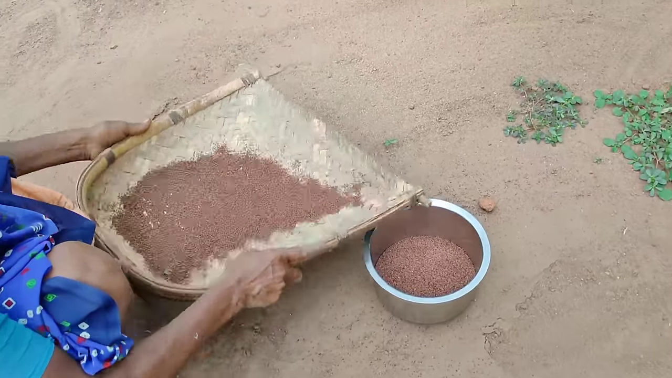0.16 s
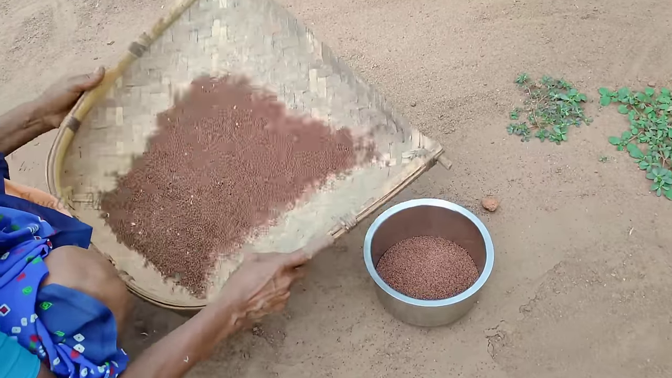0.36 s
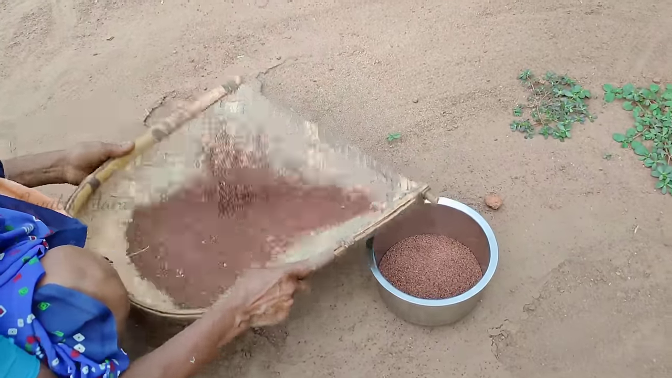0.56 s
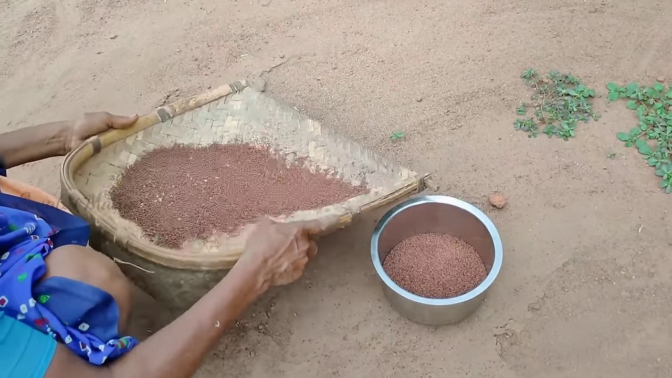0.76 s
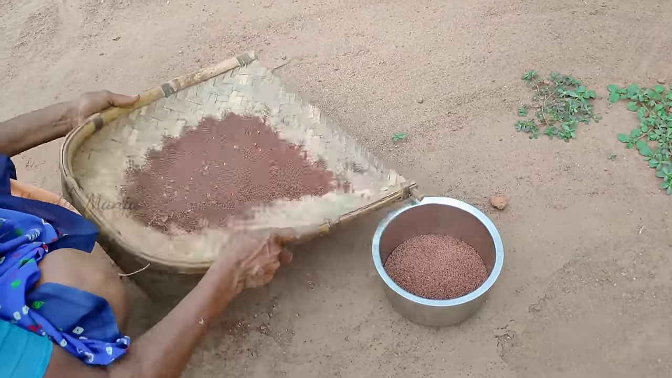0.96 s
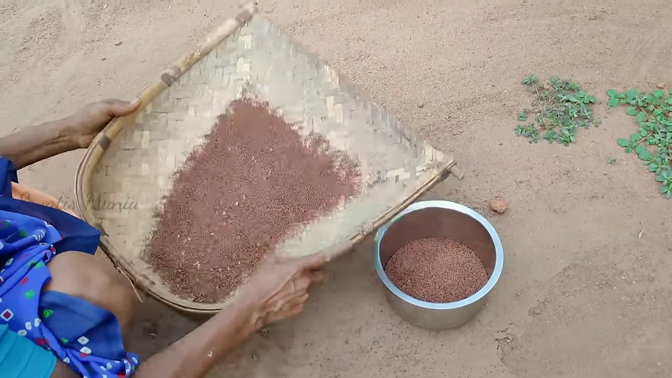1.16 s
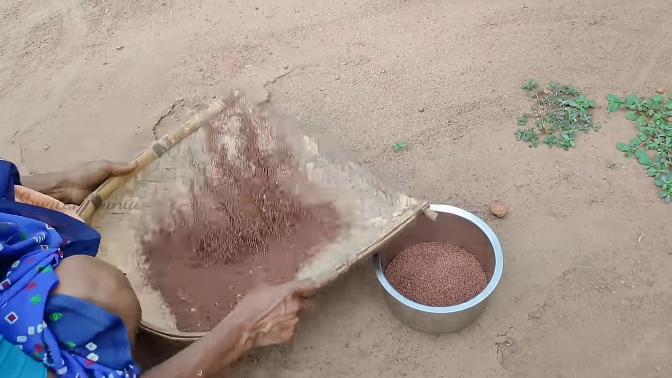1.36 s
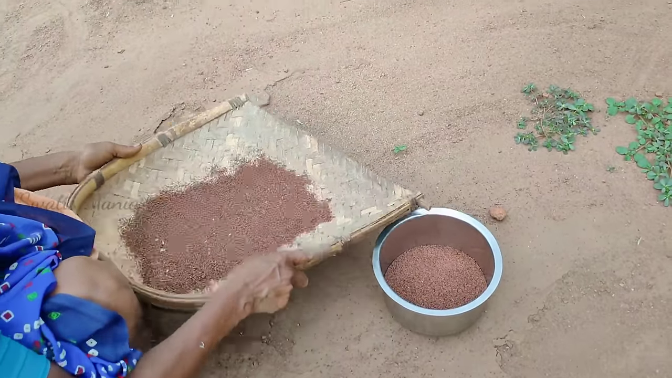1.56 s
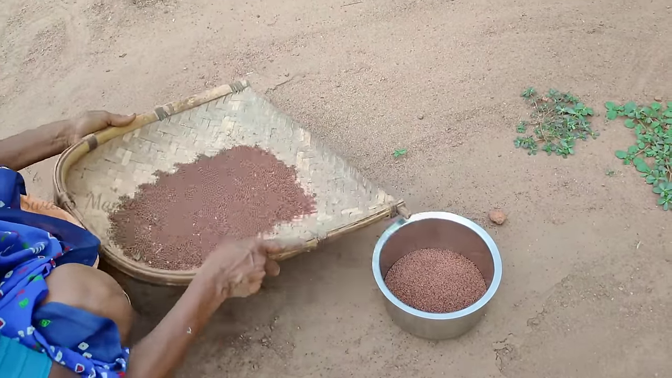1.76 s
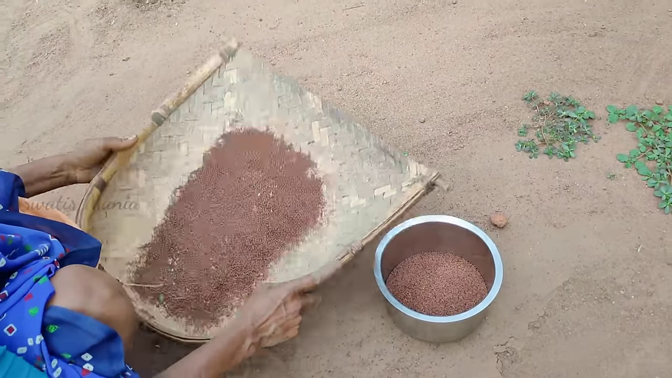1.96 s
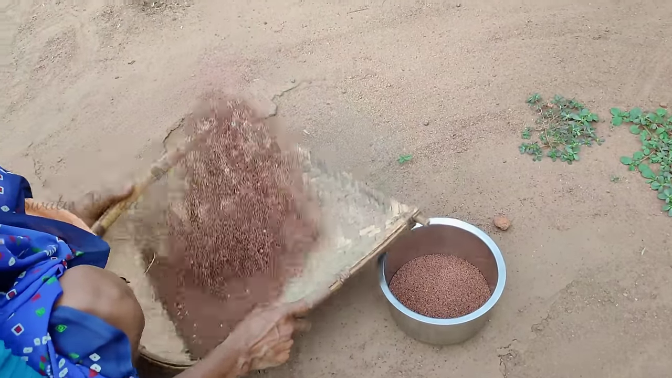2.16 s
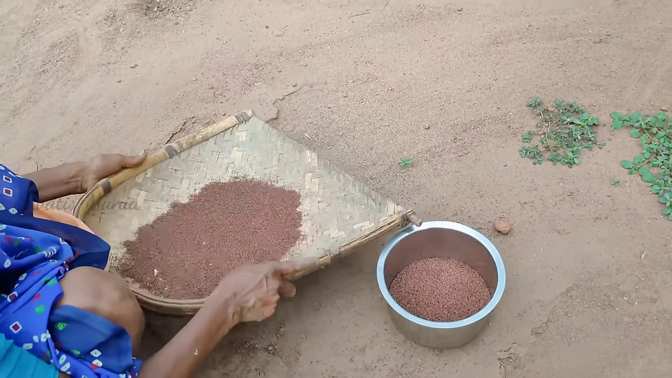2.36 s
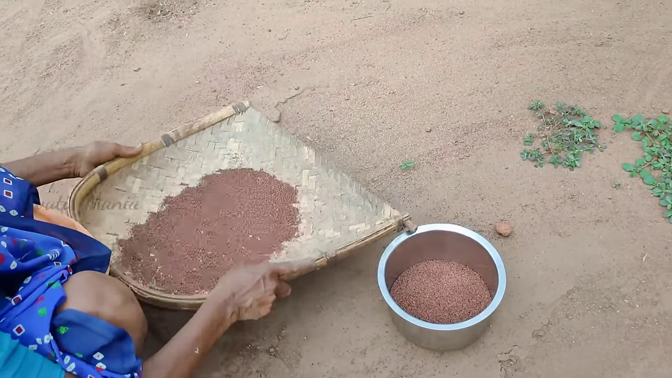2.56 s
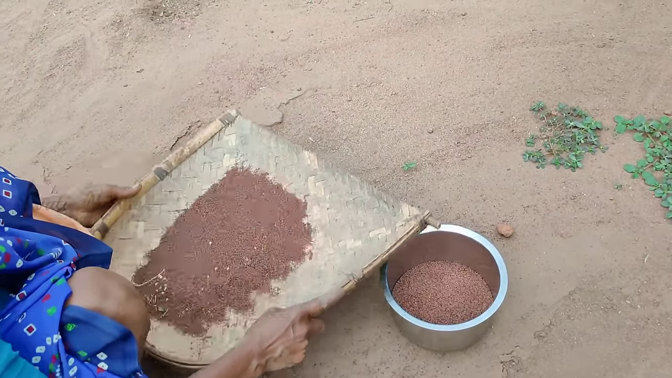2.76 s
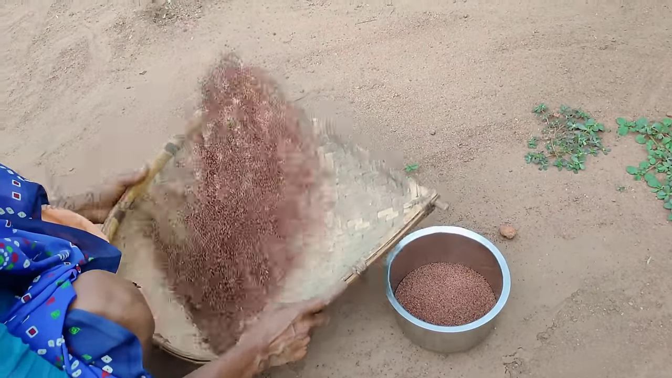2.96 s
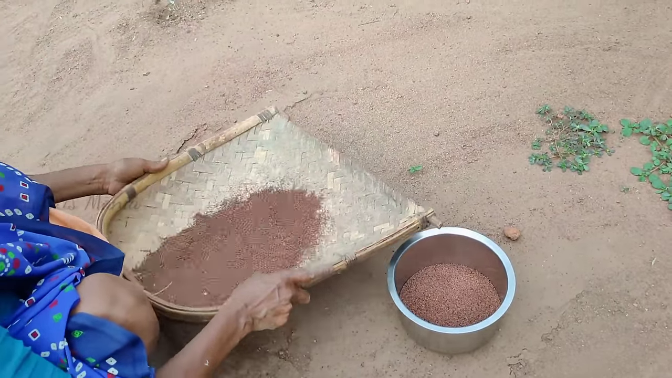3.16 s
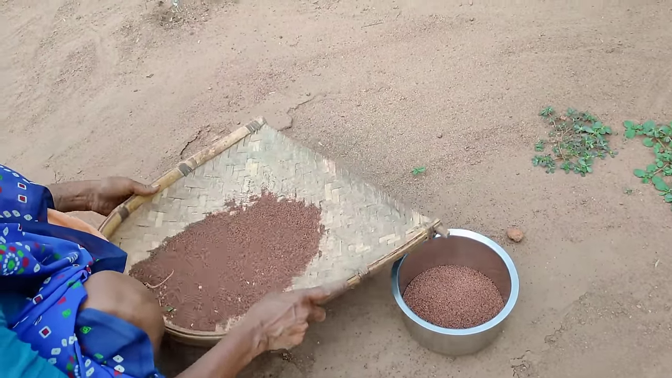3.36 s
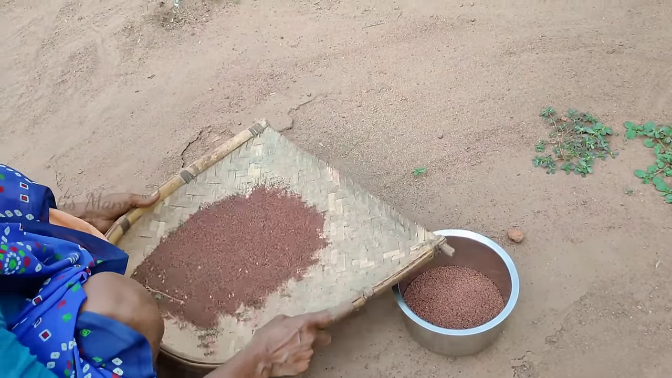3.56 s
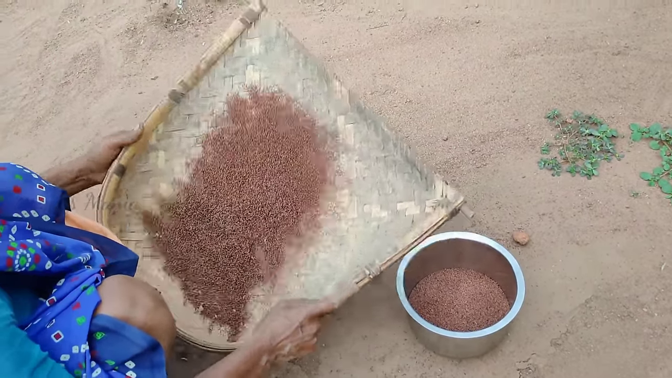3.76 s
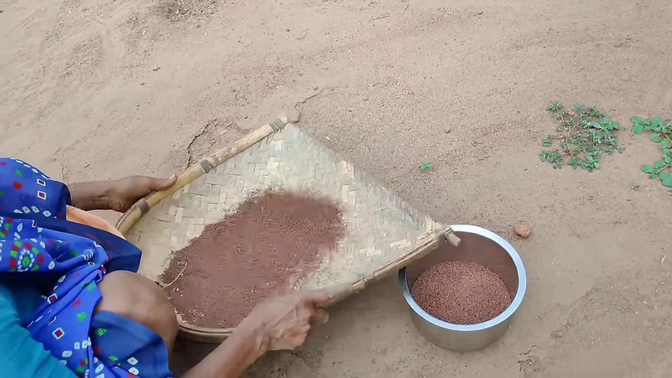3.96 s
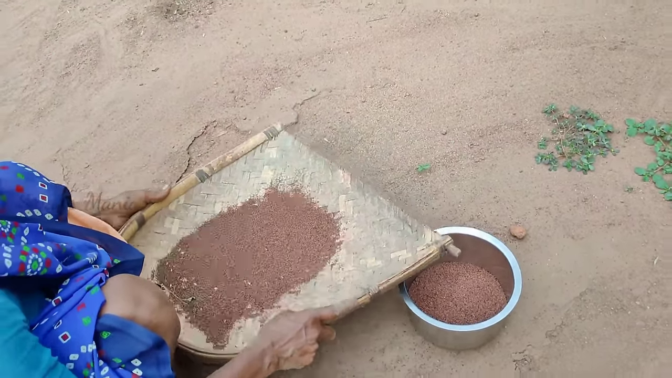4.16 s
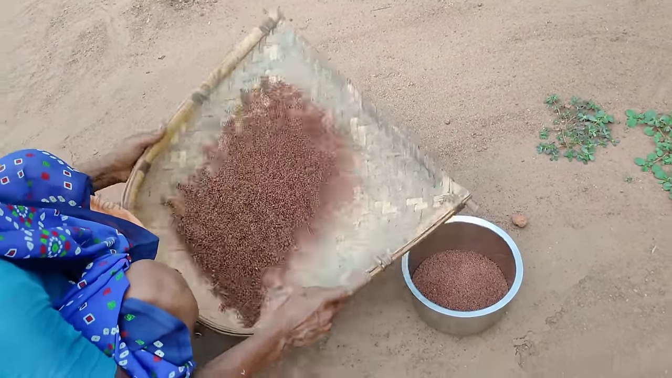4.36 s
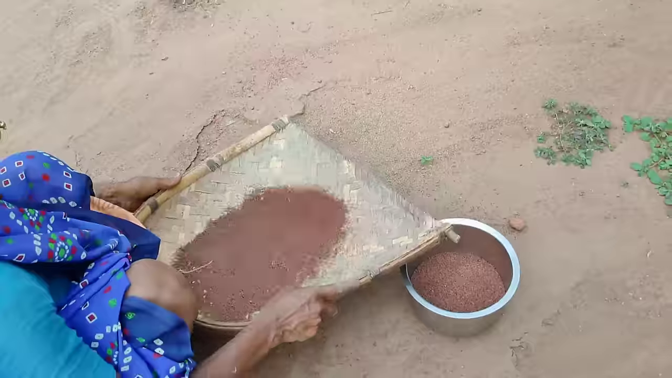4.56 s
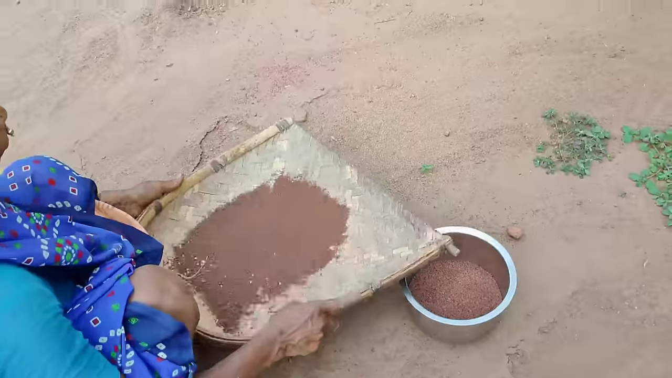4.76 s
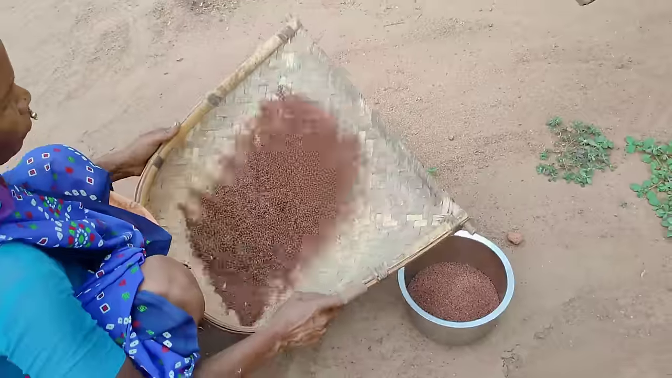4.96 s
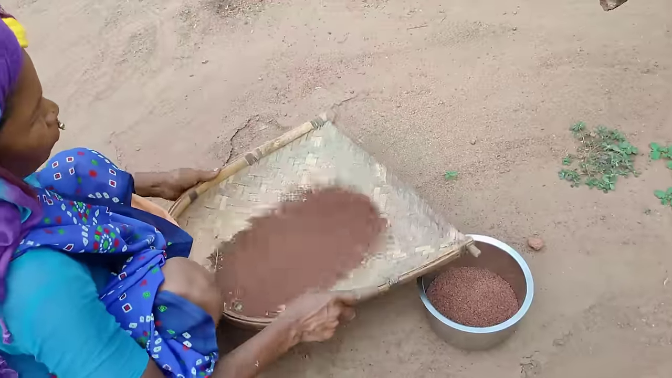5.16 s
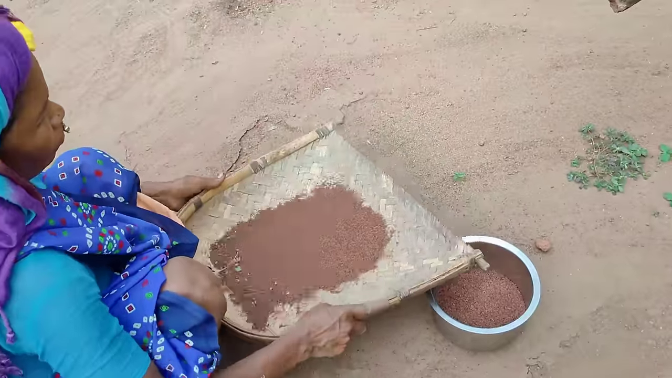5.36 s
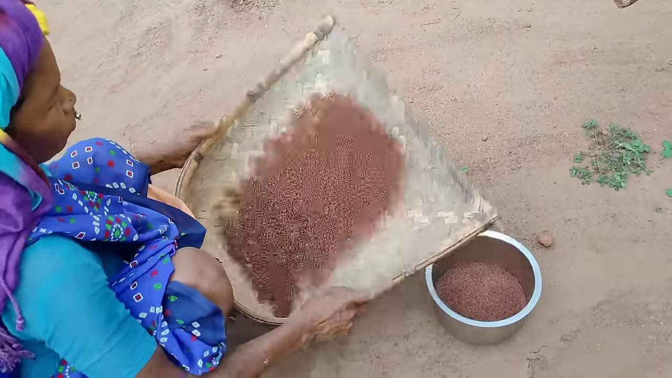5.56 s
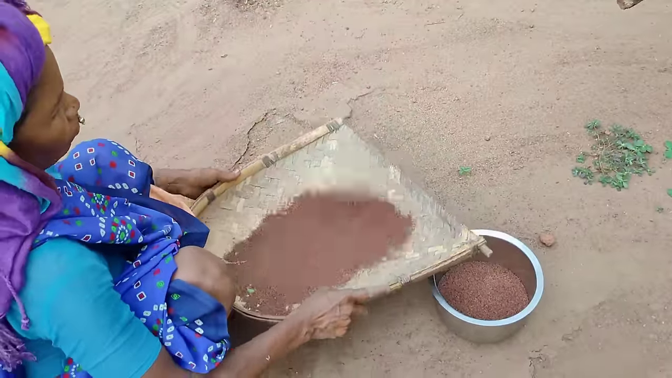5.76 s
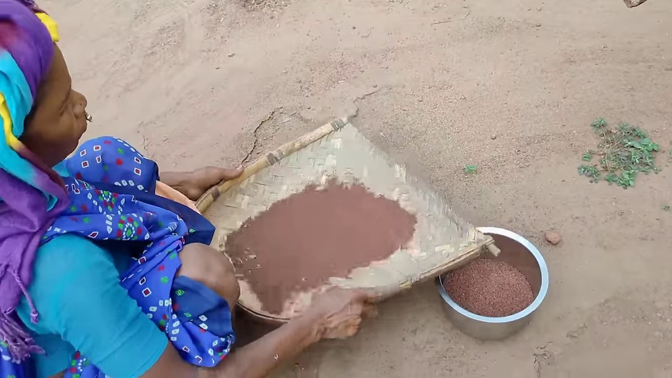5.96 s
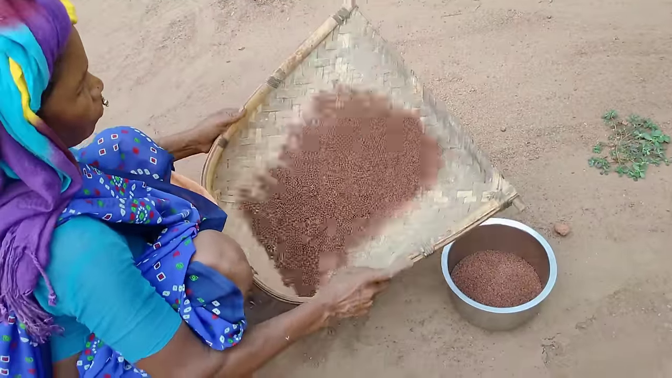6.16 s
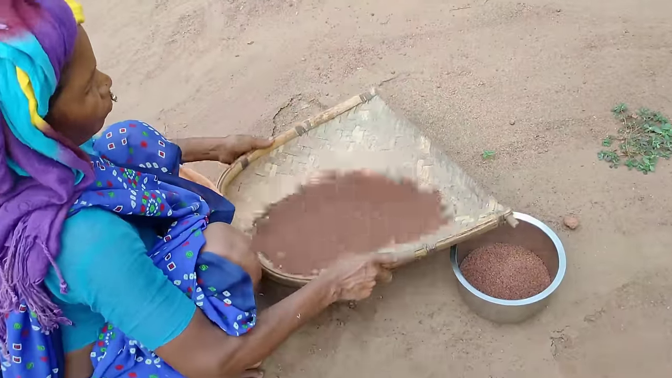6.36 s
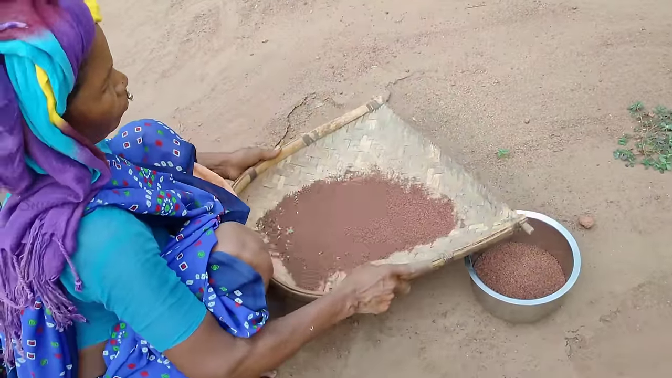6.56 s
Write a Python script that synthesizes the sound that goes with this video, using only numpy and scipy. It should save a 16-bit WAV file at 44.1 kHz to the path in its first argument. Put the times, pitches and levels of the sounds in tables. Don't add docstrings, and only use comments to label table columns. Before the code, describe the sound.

Rhythmic winnowing: thousands of small grains swish, patter and tick on a woven bamboo tray, with light hollow taps and quiet outdoor air.

```python
import sys
import numpy as np
from scipy import signal
from scipy.fft import rfft, irfft, next_fast_len
from scipy.io import wavfile

SR = 44100
rng = np.random.default_rng(int(sys.argv[2]) if len(sys.argv) > 2 else 0)


def wav_record(signal):
    frames = np.transpose(np.atleast_2d(signal))
    bounded = np.clip(frames, -1, 1)
    quanta = np.round(bounded * 32767).astype(np.int16)
    wavfile.write(sys.argv[1], SR, quanta)


def ratio_of_db(decibels):
    return 10 ** (np.asarray(decibels, float) / 20)


N = 291491
LONG = next_fast_len(N, real=True)
HZ = np.fft.rfftfreq(LONG, 1 / SR)
SHEET_LAG_MS = 0.004

# start_s, belly_db, weave_db, drop_after_s (the bed falls back), drop_db
FINGER_TAPS = [(0.0941, -34.5, -29.5, 0.017, -42.5), (0.6636, -35, -30.5, .017, -40.5),
               (0.9231, -32, -28, 0.014, -35.5), (1.5065, -34, -31, 0.022, -46.5),
               (1.759, -34, -30, 0.022, -41.5), (2.336, -35, -32, 0.021, -42),
               (2.598, -31.5, -30, 0.02, -39), (3.188, -35.5, -26, 0.021, -44),
               (3.4538, -34.5, -29, .0187, -38.5), (4.047, -38, -33.5, .018, -42.5),
               (4.66, -40, -37, 0.021, -46), (5.2512, -34, -30.5, .02, -40.5),
               (5.8507, -35.5, -32.5, .0183, -41), (6.4443, -39, -36.5, .0237, -46.5)]
# pitch_hz, left_minus_right_db
LEFT_RIGHT = [(200, 2.5), (400, 0.8), (750, 5.5), (1000, 1.5), (1350, -5), (1800, 7), (2400, -1.5),
              (4400, -.5), (8000, -2), (15000, -2)]


def rms_one(x):
    return x / np.sqrt(np.mean(x ** 2) + 1e-20)


def in_time(rows):
    s, *columns = np.transpose(rows)
    return [np.interp(np.arange(N) / SR, s, c) for c in columns]


def at_hz(points):
    hz, level_db = np.transpose(points)
    return np.interp(np.log(HZ + 1), np.log(hz), level_db)


def to_hz(x):
    return rfft(x, LONG)


def to_time(spectrum):
    return irfft(spectrum, LONG)[..., :N]


def drift(rate):
    r = np.exp(-2 * np.pi * rate / SR)
    noise = rng.standard_normal(N + 20000)
    return rms_one(signal.lfilter([1], [1, -2 * r, r * r], noise)[20000:])


def impacts(per_s, spread_db):
    sizes = ratio_of_db(spread_db * np.minimum(rng.exponential(1, N), 5)) * rng.choice([-1, 1], N)
    return rms_one(sizes * (rng.random(N) < per_s / SR))


def humps(t, top_s, level_db, swell_s, fade_s, swell, fade, hold_s=0):
    edge_db = 24
    late = t[:, None] - top_s
    before = (np.maximum(-late, 0) / swell_s) ** swell
    after = (np.maximum(late - hold_s, 0) / fade_s) ** fade
    return ratio_of_db(2 * (level_db - edge_db * (before + after)))


def blows():
    rows = []
    for s, belly_db, weave_db, after, drop_db in FINGER_TAPS:
        rows.append((s, belly_db, weave_db))
        rows.append((s + after, drop_db, drop_db + 3.5))
        rows.append((s + after + 0.00477, drop_db - 4, drop_db - 2))
    return rows


def motion(kind_db, lag_s, stretch, turn):
    # first_grains_s, swell_s, hold_s, fade_s, tick_db
    landings = [
        (-.1, 0.045, 0.049, 0.13, -32.5),
        (0.478, 0.035, .07, 0.095, -32),
        (1.309, 0.057, 0.041, 0.12, -30.5),
        (2.122, 0.07, 0.05, 0.12, -32),
        (2.95, 0.091, 0.06, 0.16, -33),
        (3.812, 0.062, 0.076, 0.18, -34.5),
        (4.403, 0.095, 0.042, 0.16, -33),
        (5.002, 0.099, 0.039, 0.15, -32),
        (5.606, 0.09, 0.06, .12, -32.5),
        (6.188, 0.12, 0.04, 0.12, -32),
    ]
    # start_s, fastest_after_s, swell_s, fade_s, tick_db
    slides = [(.093, 0.086, 0.14, 0.092, -41.5), (.664, 0.098, 0.16, 0.087, -41.5),
              (.82, .08, .12, 0.096, -44.5), (.923, 0.094, .1, 0.075, -39.5),
              (1.507, 0.066, 0.097, 0.097, -40.5), (1.66, 0.071, 0.19, 0.035, -49),
              (1.759, 0.079, 0.12, 0.087, -40), (2.336, 0.068, 0.12, 0.094, -42.5),
              (2.499, 0.067, 0.16, 0.026, -48.5), (2.598, 0.06, 0.094, 0.11, -41),
              (3.19, 0.055, 0.081, 0.094, -42), (3.34, 0.078, .2, 0.038, -51.5),
              (3.454, 0.06, 0.087, 0.11, -39.5), (4.046, 0.074, 0.095, 0.11, -43),
              (4.661, 0.087, 0.13, 0.079, -43), (5.251, 0.077, .13, 0.1, -40.5),
              (5.85, 0.071, 0.12, 0.11, -43.5), (6.444, 0.074, 0.14, 0.12, -43.5)]
    # take_off_s, swell_s, tick_db, stragglers_db, stragglers_fade_s
    lifts = [
        (.372, .1, -38.5, -59.5, 0.047),
        (1.225, 0.13, -35, -53.5, 0.049),
        (2.046, 0.12, -36.5, -62.5, .07),
        (2.888, 0.11, -36, -61, 0.11),
        (3.743, .12, -36.5, -46.5, 0.056),
        (4.34, .11, -38, -58, 0.13),
        (4.949, .11, -37, -52, 0.17),
        (5.547, 0.12, -38.5, -57.5, .3),
        (6.147, .11, -38, -56.5, 0.4),
    ]
    # time_s, rustle_db
    turning = [(0, 0.6), (2.3, 1.36), (3, 0.1), (4.4, -1.5), (5.1, -0.37), (6.61, -0.5)]
    t = np.arange(0, N + 32, 32) / SR

    s, swell, hold, fade, db = np.transpose(landings)
    thinning = ratio_of_db(-2 * 4 * np.clip(t[:, None] - s - swell, 0, hold))
    sharper_swell = (swell + lag_s[0]) * (24 / 30.5) ** (1 / 1.99)
    rain = thinning * humps(t - lag_s[0], s + swell, db, sharper_swell, fade * stretch, 1.99, 1.23, hold)

    s, delay, swell, fade, db = np.transpose(slides)
    slide = humps(t - lag_s[1], s + delay, db, swell * stretch, fade * stretch, 1.9, 2.87)

    s, swell, db, late_db, late_s = np.transpose(lifts)
    take_off_s = 0.0053
    fastest_s = s - 0.05
    lift = humps(t - lag_s[2], fastest_s, db, swell * stretch, 0.1, 2.05, 1.94)
    lift = lift * humps(t, s, 0, 1e3, take_off_s, 2, 0.67)
    lift = lift + humps(t, s, late_db, take_off_s, late_s, 2, 2.5)

    s, after = np.transpose(FINGER_TAPS)[[0, 3]]
    hop_s, hop_depth = 0.013, 0.38
    airborne = humps(t, s + hop_s, 0, .003, .003, 2, 2, after - hop_s)
    hop = 1 - hop_depth * airborne.sum(axis=1, keepdims=True)

    s, _, db = np.transpose(blows())
    jolt = humps(t, s, db - 20, 0.0012, 0.018, 1.6, 2.9)

    kinds = (rain, slide * hop, lift, jolt)
    power = sum(p.sum(axis=1) * ratio_of_db(2 * g) for p, g in zip(kinds, kind_db))
    return np.interp(np.arange(N) / SR, t, np.sqrt(power)) * ratio_of_db(turn * in_time(turning)[0])


def paths(place, lead_ms, width_ms, echo_ms, echo):
    lag = np.array([[0], [lead_ms + width_ms * place]]) / 1000
    bounce = np.array(echo_ms)[:, None] / 1000 * (1 + 0.39 * place)
    rough_earth_db = at_hz([(2000, -26.0), (7000, -56), (16000, -23)])
    gain = np.array(echo)[:, None] * ratio_of_db(rough_earth_db)
    return np.exp(-2j * np.pi * HZ * lag) * (1 + gain * np.exp(-2j * np.pi * HZ * bounce))


def grain():
    # pitch_hz, level_db
    tick_tone = [(880, -26.5), (1500, -5), (1580, -6.5), (1940, -9), (2250, -6.5), (3360, -5.5),
                 (4100, -1.5), (4610, -6), (6570, -3), (7700, 0.5), (12000, 3), (14900, 1), (15800, -37)]
    # pitch_hz, level_db
    drum_tone = [(110, -59), (180, -13.5), (211, -22.5), (342, -8.5), (468, -7.5), (512, -4.5), (737, -6.5),
                 (1040, 0.5), (1330, 2.5), (1530, -16), (1690, -8.5), (1900, -15.5), (2470, -78),
                 (4180, -120)]
    # landing_db, slide_db, lift_db, jolt_db
    rustle_db = (-12, -12, -13.5, -7)
    # landing_db, slide_db, lift_db, jolt_db
    drum_db = (-18.5, -16.5, -17.5, -8)
    # landing_s, slide_s, lift_s
    drum_lag_s = (0.0092, -0.0039, -0.011)
    upper = 1 / (1 + (5000 / (HZ + 1)) ** 6)
    sides = ratio_of_db(at_hz(LEFT_RIGHT) * [[.5], [-.5]])
    colour = ratio_of_db(at_hz(tick_tone[:-1])) * (HZ > 700)

    shares = ratio_of_db(4 * np.array([drift(3) for _ in range(6)]))
    shares = shares / np.sqrt(np.mean(shares ** 2, axis=0))
    tick = rustle = 0
    for place, share in zip(np.linspace(-1, 1, 6), shares):
        flutter = ratio_of_db(1.35 * drift(33))
        contacts = to_hz(impacts(per_s=5000, spread_db=2.0) * share * flutter)
        heard = contacts * sides * paths(place, lead_ms=0.0071, width_ms=0.051,
                                         echo_ms=(.22, .37), echo=(.32, .45))
        tick = tick + heard * np.sqrt(upper) * colour
        rustle = rustle + heard * np.sqrt(1 - upper) * colour

    hits = to_hz(impacts(per_s=5800, spread_db=3.0) * ratio_of_db(1.3 * drift(52)))
    edge = to_hz(rng.standard_normal((2, N)))
    late = np.exp(-2j * np.pi * HZ * np.array([[0], [SHEET_LAG_MS / 1000]]))
    drum = (hits * late + 0.041 * edge) * sides * ratio_of_db(at_hz(drum_tone))

    ticking = motion((0, 0, 0, 0), (0, 0, 0), 0.87, 0) * rms_one(to_time(tick))
    rustling = motion(rustle_db, (0, 0, 0), 0.94, 1) * rms_one(to_time(rustle))
    drumming = motion(drum_db, drum_lag_s, 0.9, 0.38) * rms_one(to_time(drum))
    return ticking + rustling + drumming


def yard():
    # pitch_hz, level_db
    yard_tone = [(18, -28), (30, -28.5), (134, 21), (698, 11), (1120, -25), (1530, 42), (3740, 33),
                 (4370, 43), (5990, 23.5), (15800, -70.5)]
    # pitch_hz, level_db
    wind_tone = [(25, -18), (60, -19), (130, -7.5), (250, -13.5), (500, -6), (1000, -16.5)]
    strays = impacts(per_s=1100, spread_db=6.5)
    hiss, gusts = rng.standard_normal((2, 2, N))
    murmur = rms_one(to_time(to_hz(0.33 * strays + hiss) * ratio_of_db(at_hz(yard_tone[:-1]))))
    wind = rms_one(to_time(to_hz(gusts) * ratio_of_db(at_hz(wind_tone)))) * ratio_of_db(0.85 * drift(16))
    return ratio_of_db(-70) * murmur + ratio_of_db(-67) * wind * ratio_of_db(np.array([[-2.5], [2.5]]))


def taps():
    # start_s, belly_db, weave_db
    flicks = [(0.36, -39, -45), (.398, -76, -57), (.42, -76, -61), (.44, -63, -54), (1.211, -47, -53),
              (1.2796, -61, -48), (2.0332, -41, -47), (2.072, -75, -59), (2.1022, -66, -49),
              (2.8774, -40, -42.5), (2.946, -64, -50), (3.7295, -41.5, -50), (3.764, -63, -56),
              (3.797, -64, -53), (4.3321, -45.5, -57), (5.5426, -38.5, -52), (6.1413, -35, -49.5)]
    # pitch_hz, level_db, swell_s, first_swing
    belly_modes = [(306, -10.5, 0.0011, -0.88), (366, -7, .0011, -0.64), (393, -16.5, 0.0028, -0.82),
                   (564, -3.5, 0.0009, 0.8), (693, -10, 0.0024, -0.12)]
    # pitch_hz, level_db, swell_s, first_swing
    weave_modes = [(1056, 1, 0.00068, 0.83), (1278, -3.5, 0.00077, 1), (1850, -19, 0.00047, -0.74),
                   (2600, -16.5, 0.00049, 1), (3400, -18, 0.00028, 1)]
    rows = np.array(blows() + list(flicks))
    t = np.arange(1400) / SR
    late = np.maximum(t - np.array([[0], [SHEET_LAG_MS / 1000]]), 0)
    modes = [(1, m) for m in belly_modes] + [(2, m) for m in weave_modes]
    luck = rng.standard_normal((len(rows), 2, len(modes)))
    balance_hz, balance_db = np.transpose(LEFT_RIGHT)
    swings = np.zeros((len(rows), 2, len(t)))
    for k, (column, (hz, level_db, swell, first)) in enumerate(modes):
        side_db = np.interp(np.log(hz), np.log(balance_hz), balance_db) * np.array([[.5], [-.5]])
        shape = (late / swell) ** 2.12 * np.exp(.75 - late / swell) * first * ratio_of_db(side_db)
        pitch = hz * (1 + .07 * luck[:, 0, k])
        strength = ratio_of_db(rows[:, column] + level_db + 2.2 * luck[:, 1, k])
        swings += strength[:, None, None] * shape * np.sin(2 * np.pi * pitch[:, None, None] * late)
    out = np.zeros((2, N + len(t)))
    for s, swing in zip(rows[:, 0], swings):
        out[:, int(s * SR):int(s * SR) + len(t)] += swing
    no_bass = signal.butter(4, 190, "high", fs=SR, output="sos")
    return signal.sosfilt(no_bass, out[:, :N])


def thumps(events, gain_db, damping, cut_hz):
    out, t = np.zeros(N + 3000), np.arange(3000) / SR
    for s, level_db, hz in events:
        swing = np.sin(2 * np.pi * hz * t) * hz * t * np.exp(-damping * hz * t)
        out[int(s * SR):][:3000] -= ratio_of_db(level_db + gain_db) * swing
    return signal.sosfilt(signal.butter(2, cut_hz, "high", fs=SR, output="sos"), out[:N])


def bumps():
    # start_s, peak_db, pitch_hz
    puffs = [
        (0.361, -75, 74.3),
        (1.21, -81, 75),
        (2.033, -82, 75),
        (2.878, -72, 75),
        (3.729, -70, 75),
        (4.331, -77, 75),
        (5.542, -75.5, 75),
        (6.141, -77, 75),
    ]
    # start_s, peak_db, pitch_hz
    hand_bumps = [(1.634, -55, 272), (3.577, -51, 385), (3.722, -50, 226), (3.742, -52, 91.5),
                  (3.816, -45, 118), (4.011, -57, 91.5), (4.594, -45, 224), (4.678, -41.5, 286),
                  (4.696, -51, 258), (4.725, -55, 213), (4.737, -59, 210), (4.75, -56, 342),
                  (4.764, -58, 261), (4.794, -47, 358), (4.826, -42, 175), (4.867, -51, 380),
                  (4.932, -42.5, 358), (4.947, -46, 148), (5.005, -44.5, 260), (5.018, -50, 175),
                  (5.072, -52, 398), (5.134, -53, 193), (5.152, -51, 398), (6.342, -52, 389)]
    hand = thumps(hand_bumps, gain_db=28.0, damping=4.53, cut_hz=123) * ratio_of_db(np.array([[-20], [0]]))
    return hand + thumps(puffs, gain_db=25.5, damping=2.3, cut_hz=31)


def scene():
    return grain() + yard() + taps() + bumps()


def roll_off(x):
    return signal.sosfilt(signal.butter(12, 16830, fs=SR, output="sos"), x)


def record(dry):
    # time_s, share (0-1)
    covering = [
        (0, 0),
        (4.3, 0.01),
        (4.65, 0),
        (4.8, 0.98),
        (5.5, 0.98),
        (6.61, 0.95),
    ]
    # pitch_hz, width_hz, signed gain
    cavity = [(670, 113, 1.24), (1310, 600, -.5), (1810, 350, 2.5), (3900, 480, -0.85), (7720, 1340, 3),
              (9500, 2200, -0.5), (12500, 3000, 0.47)]
    # pitch_hz, phase_radians
    open_phase = [(0, 0), (1000, -.7), (1350, -1.1), (1550, -3.1), (2250, -9.4), (3100, -12.6),
                  (4150, -15.7), (6400, -22), (14000, -40.8)]
    # pitch_hz, phase_radians
    cupped_phase = [(0, 0), (3100, -.4), (3950, -3.1), (5400, -6.3), (7000, -9.4), (14000, -28)]
    hollow = dry[1]
    for hz, width_hz, gain in cavity:
        r = np.exp(-np.pi * width_hz / SR)
        feedback = [1, -2 * r * np.cos(2 * np.pi * hz / SR), r * r]
        hollow = hollow + gain * signal.lfilter([(1 - r * r) / 2, 0, (r * r - 1) / 2], feedback, dry[1])
    cover = in_time(covering)[0]
    turns = [0 * HZ] + [np.interp(HZ, *np.transpose(table)) for table in (open_phase, cupped_phase)]
    spectra = to_hz(np.array([dry[0], dry[1], hollow])) * np.exp(1j * np.array(turns))
    left, bare, cupped = to_time(spectra * (HZ < 15750))
    right = np.sqrt(1 - cover) * bare + np.sqrt(cover) * ratio_of_db(-2.5) * cupped
    mix = np.array([left * ratio_of_db(-1.5 * cover), right])
    return roll_off(mix)


dry = scene()
out = record(dry)
wav_record(out)
```